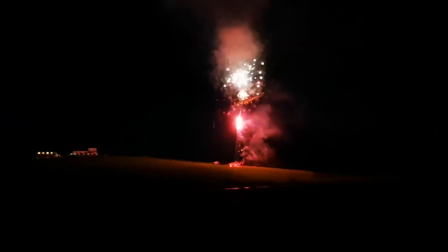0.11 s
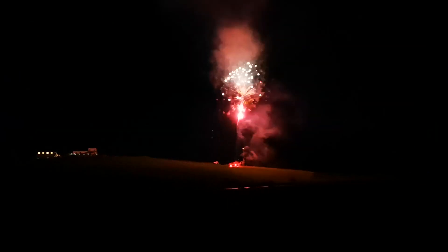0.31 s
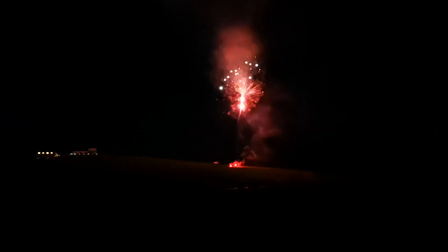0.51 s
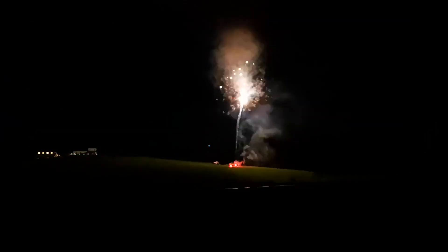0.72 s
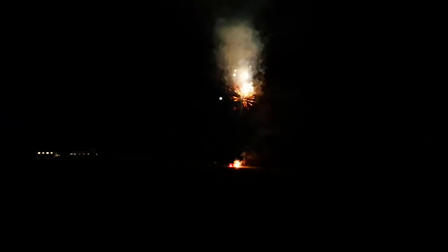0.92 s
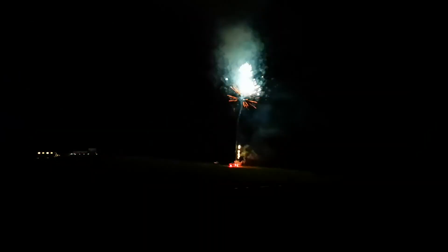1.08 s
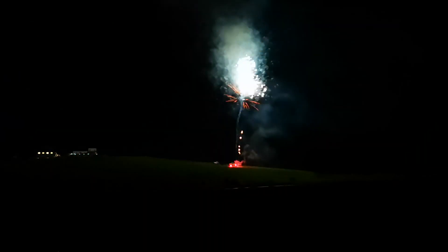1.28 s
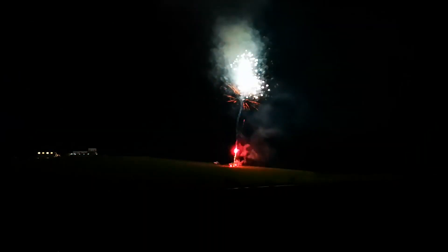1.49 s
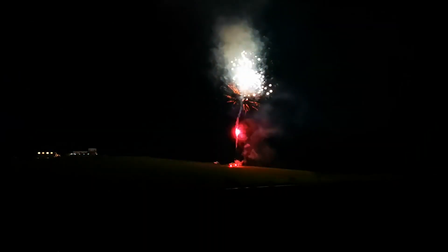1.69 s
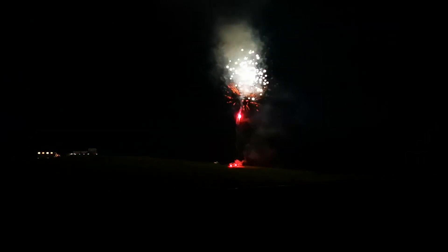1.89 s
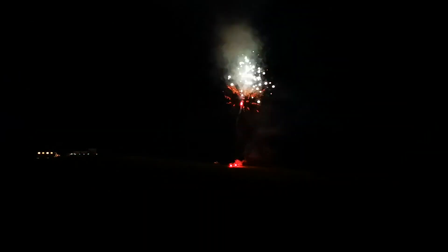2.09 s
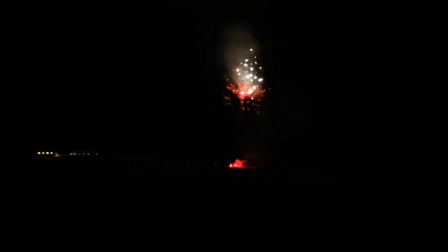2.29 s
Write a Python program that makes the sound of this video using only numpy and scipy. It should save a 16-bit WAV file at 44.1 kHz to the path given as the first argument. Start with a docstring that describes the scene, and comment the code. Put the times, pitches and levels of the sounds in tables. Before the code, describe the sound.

Sharp firework bursts and low mortar launch thumps, with soft echoes rolling over a dark field

```python
"""Sharp bangs and lower thumps of fireworks across an open field at night, over faint night air.
Six shells burst overhead: each is a pressure spike with a bounce off the ground and a dull slap echo.
Five more leave their mortar tubes: a low thump, a muzzle crack and a short ring of the tube.
Things near the microphone scatter every bang; the far edge of the field returns a long soft wash."""
import sys
import numpy as np
from scipy import signal
from scipy.fft import rfft, irfft
from scipy.io import wavfile
from scipy.ndimage import uniform_filter1d, minimum_filter1d

SR = 44100
rng = np.random.default_rng(int(sys.argv[2]) if len(sys.argv) > 2 else 0)


def to_wav(sig):
    """Store sig (one row per channel, or 1-D mono) as 16-bit WAV at the path in sys.argv[1].

    Samples outside -1..1 are clipped; the rate is SR.
    """
    pcm = np.clip(np.atleast_2d(sig), -1, 1) * 32767
    pcm = np.round(pcm).astype(np.int16)
    wavfile.write(sys.argv[1], SR, pcm.T)  # frames by channels


N = 108045
T = np.arange(N) / SR


def from_db(db):
    """Decibels to gain."""
    return 10 ** (np.asarray(db) / 20)


def at_hz(points, hz):
    """Read a table along log frequency."""
    table_hz, values = np.transpose(points)
    return np.interp(np.log(np.maximum(hz, 1)), np.log(table_hz), values)


def since(start_s):
    """Time elapsed after start_s, zero before it."""
    return np.maximum(T - start_s, 0)


def delayed(x, delay_s):
    """The same sound delay_s seconds later."""
    return np.interp(T - delay_s, T, x, left=0)


def ring_down(t, t60_s):
    """Exponential decay that falls 60 dB in t60_s."""
    return np.exp(-np.log(1000) * t / t60_s)


def through(x, response):
    """Send a sound through a one- or two-channel response."""
    return signal.fftconvolve(np.atleast_2d(x), np.atleast_2d(response), axes=1)[:, :N]


def causal_filter(points, size=8192):
    """Minimum-phase response with the given colour: the cepstrum is folded onto positive time."""
    hz = np.arange(size // 2 + 1) * SR / size
    cepstrum = irfft(np.log(from_db(at_hz(points, hz))))
    cepstrum[1:size // 2] *= 2
    cepstrum[size // 2 + 1:] = 0
    return irfft(np.exp(rfft(cepstrum)))


def band_pass(x, low_hz, high_hz):
    """Keep what lies between two frequencies."""
    x = x + 1e-18  # inaudible offset keeps the filters clear of denormal numbers
    x = signal.sosfilt(signal.butter(3, low_hz, "high", fs=SR, output="sos"), x)
    return signal.sosfilt(signal.butter(6, high_hz, fs=SR, output="sos"), x)


def wander(per_s):
    """A random curve of unit size that heads for a new value per_s times a second."""
    values = rng.standard_normal(2000)
    return np.interp(T * per_s, np.arange(len(values)), values)


# likeness of the left and right channels: pitch_hz, likeness (0 unrelated, 1 identical)
LIKENESS = [(60, .99), (200, 0.99), (450, 0.33), (1000, 0.02), (2000, 0.18), (8000, 0)]


def noise_bands():
    """Half-octave bands of stereo noise, alike in the bass and mostly unrelated above: (hz, band)."""
    edges = 22 * 2 ** (np.arange(20) / 2)
    warm_up = SR // 2  # samples dropped while the filters settle
    white = rng.standard_normal((2, 2, N + warm_up))  # neighbouring bands use different noise
    for k, (low, high) in enumerate(zip(edges, edges[1:])):
        band_filter = signal.butter(2, [low, high], "band", fs=SR, output="sos")
        mid, side = signal.sosfilt(band_filter, white[k % 2])[:, -N:]
        hz = np.sqrt(low * high)
        alike = np.clip(at_hz(LIKENESS, hz), 0, 1)
        opposed = side * [[1], [-1]]
        yield hz, np.sqrt((1 + alike) / 2) * mid + np.sqrt((1 - alike) / 2) * opposed


# colour of the night air before its overall level is set: pitch_hz, level_db (relative, per Hz)
AIR_COLOUR = [(25, -3.5), (45, -1.5), (65, 0), (90, -7), (150, -15), (400, -17), (900, -16.5), (1300, -19),
              (2000, -19.5), (3200, -29.5), (5000, -33.5), (7500, -38), (10000, -49), (15000, -56)]
# level of the air with the lingering wash of bursts, above the rumble: time_s, level_db (relative)
BACKGROUND_LEVEL = [(0, 4.5), (.7, 1), (1.3, 2), (1.9, 6.5), (2.45, 9.5)]
AIR_DB, AIR_FLICKER_DB, RUMBLE_TOP_HZ = -54, 2, 130


def night_air():
    """A faint rumble and hiss with lingering burst wash: noise bands, each wavering on its own."""
    background_db = np.interp(T, *np.transpose(BACKGROUND_LEVEL))
    air = 0
    for hz, band in noise_bands():
        flicker_db = AIR_FLICKER_DB * wander(9.2)
        level_db = at_hz(AIR_COLOUR, hz) + flicker_db + background_db * (hz > RUMBLE_TOP_HZ)
        air = air + band * from_db(level_db)
    return from_db(AIR_DB) * air / air.std()


# shell bursts: start_s, level_db (re a peak of 2, before colour), spike_ms (decay constant),
# bounce_ms (delay), bounce_db, slap_ms (delay), slap_db (before the slap band),
# scatter_db, wash_db (sends); bounce and slap levels are relative to the spike
BURSTS = [(0.232, 2, 0.17, 3.61, -9, 22.8, -19, -3, 0), (0.8573, 1, .1, 3.6, -11.5, 22.1, -25.5, 0, 0.5),
          (1.5549, 2.5, 0.078, 3.3, -14.5, 19, -22.5, -0.5, -1),
          (1.6230, -3, 0.14, 3.75, -8, 25.7, -18.5, 1, -6),
          (1.7143, 0.5, 0.072, 4.1, -11.5, 13.4, -26, 0.5, 0),
          (2.0064, -3, 0.13, 3.89, -8.5, 25.4, -19.5, 0.5, 2)]
# colour of a burst as the microphone and recorder give it, thin deep bass and dull top:
# pitch_hz, level_db
BURST_COLOUR = [(25, -10.5), (55, -11.5), (100, 0.5), (170, 4), (270, 5), (470, -2.5), (900, 2.5),
                (1300, 0.5), (1750, 5.5), (2500, 0.5), (4500, -6), (7600, -6), (9300, -15.5), (11000, -26),
                (16000, -37.5)]
SLAP_LOW_HZ, SLAP_HIGH_HZ = 610, 2820


def bursts():
    """A shock spike, its ground bounce and a dull slap; returns direct sound, scatter and wash feeds."""
    direct, slaps, scatter_feed, wash_feed = np.zeros((4, N))
    for start_s, db, spike_ms, bounce_ms, bounce_db, slap_ms, slap_db, scatter_db, wash_db in BURSTS:
        decay = np.exp(-np.minimum(since(start_s) * 1000 / spike_ms, 50))
        spike = 2 * from_db(db) * (T >= start_s) * decay
        bang = spike + from_db(bounce_db) * delayed(spike, bounce_ms / 1000)
        direct += bang
        slaps += from_db(slap_db) * delayed(spike, slap_ms / 1000)
        scatter_feed += from_db(scatter_db) * bang
        wash_feed += from_db(wash_db) * spike
    direct += band_pass(slaps, SLAP_LOW_HZ, SLAP_HIGH_HZ)
    return through([direct, scatter_feed, wash_feed], causal_filter(BURST_COLOUR))


# mortar launches: start_s, thump_db, thump_hz, ring_db, pitch (ratio to the tube table),
# tilt_db (ring, per octave above the first mode), crack_db (re an impulse of 10, before colour)
LAUNCHES = [(0.3292, -23, 103, -29.5, 0.95, 10.5, -19), (0.4278, -17, 94, -18.5, 1.095, -4, -14.5),
            (0.4630, -19.5, 93, -18.5, 1.033, 7.5, -9.5), (0.4934, -20, 95, -16.5, 1.0, -5, -12),
            (2.1638, -18, 95.7, -18, 1.05, 2.5, -25.5)]
# modes of the mortar tube: pitch_hz (before the pitch ratio), level_db (re ring_db), t60_s
TUBE_MODES = [(1555, -19, 0.012), (1613, 0.5, 0.014), (2160, -11.5, 0.0099), (2950, -6.5, .012),
              (3520, -15, 0.019), (5460, -45, 0.027), (6500, -17, 0.0057)]
# colour of the muzzle crack: pitch_hz, level_db
CRACK_COLOUR = [(300, -33.5), (900, -34.5), (1400, 5.5), (2200, 1.5), (3100, -0.5), (4400, -7.5),
                (6500, -15), (8500, -26.5), (11000, -50.5), (16000, -50.5)]
# dull echoes of the tube: delay_s, level_db
TUBE_ECHOES = [(.0098, -14.5), (0.0354, -14)]
THUMP_DECAY_S, THUMP_LEAD_S = .003, 0.00092  # the thump starts this much before the crack
BOOM_DB, BOOM_HZ, BOOM_T60_S = -17.5, 101, 0.064  # level relative to the thump
TUBE_LOW_HZ, TUBE_HIGH_HZ, TUBE_ECHO_HIGH_HZ = 1190, 6500, 2060


def launches():
    """The lift charge heaves the air, cracks at the muzzle and rings the tube: (thumps, knocks)."""
    thumps, rings, cracks = np.zeros((3, N))
    for start_s, thump_db, thump_hz, ring_db, pitch, tilt_db, crack_db in LAUNCHES:
        t = since(start_s - THUMP_LEAD_S)
        push = t ** 2 * np.exp(-t / THUMP_DECAY_S)
        swing = push / push.max() * np.sin(2 * np.pi * thump_hz * t)
        boom = from_db(BOOM_DB) * np.sin(2 * np.pi * BOOM_HZ * t) * ring_down(t, BOOM_T60_S)
        thumps += from_db(thump_db) * (swing + boom)

        t = since(start_s)
        for mode_hz, mode_db, t60_s in TUBE_MODES:
            tilted_db = tilt_db * np.log2(mode_hz / TUBE_MODES[0][0])
            chance_db = rng.standard_normal()
            strength = from_db(ring_db + mode_db + tilted_db + chance_db)
            rings += strength * np.sin(2 * np.pi * mode_hz * pitch * t) * ring_down(t, t60_s)
        cracks[int(start_s * SR)] += 10 * from_db(crack_db)

    knocks = band_pass(rings, TUBE_LOW_HZ, TUBE_HIGH_HZ)
    knocks = knocks + through(cracks, causal_filter(CRACK_COLOUR))[0]
    dull = band_pass(knocks, TUBE_LOW_HZ, TUBE_ECHO_HIGH_HZ)
    tube_echoes = sum(from_db(db) * delayed(dull, delay_s) for delay_s, db in TUBE_ECHOES)
    return thumps, knocks + tube_echoes


# reflections from things by the microphone, before the bass is cut: delay_ms, left_db, right_db
REFLECTIONS = [(.14, -9.5, -15.5), (.66, -14.5, -32.5), (1.06, -15, -19), (2.9, -13, -27.5),
               (13.2, -25.5, -24.5)]
REFLECTION_LOW_HZ = 348
SPRAY_DB, SPRAY_T60_S, SPRAY_LOW_HZ, SPRAY_HIGH_HZ = -6.5, .018, 2200, 10300


def close_reflections():
    """Direct path, a few reflections thin in bass and a fine bright spray, different at each ear."""
    fade = ring_down(T, SPRAY_T60_S)
    spray = band_pass(rng.standard_normal((2, N)), SPRAY_LOW_HZ, SPRAY_HIGH_HZ)
    spray = spray * fade / np.linalg.norm(fade)
    taps = 0
    for delay_ms, left_db, right_db in REFLECTIONS:
        tap = np.maximum(1 - np.abs(T - delay_ms / 1000) * SR, 0)  # impulse between samples
        taps = taps + from_db([[left_db], [right_db]]) * tap
    bass_cut = signal.butter(1, REFLECTION_LOW_HZ, "high", fs=SR, output="sos")
    taps = signal.sosfilt(bass_cut, taps + 1e-18)
    return (T == 0) + taps + from_db(SPRAY_DB) * spray


def echoes(colour, envelope_at):
    """Response of countless small echoes: noise bands, each under its own envelope."""
    response = 0
    for hz, band in noise_bands():
        envelope = envelope_at(hz)
        response = response + band * envelope * from_db(at_hz(colour, hz)) / np.linalg.norm(envelope)
    return response


def dying(t60s, delay_s, rise_s):
    """Envelope that builds up, then dies at each band's own rate."""
    t = since(delay_s)
    onset = 1 - np.exp(-t / rise_s)
    return lambda hz: onset * ring_down(t, at_hz(t60s, hz))


# colour of the scatter from things close by: pitch_hz, level_db
SCATTER_COLOUR = [(60, 5.5), (200, -8), (450, -4), (1000, -14), (2000, -13), (4000, -10.5), (9000, -9.5),
                  (13000, -3)]
# how long the scatter lasts: pitch_hz, t60_s
SCATTER_T60 = [(80, 0.22), (300, 0.24), (1000, 0.24), (3000, 0.18), (10000, 0.16)]
SCATTER_DELAY_S, SCATTER_RISE_S = 0.0013, 0.00084
SCATTER_LUMPS_PER_S, SCATTER_LUMP_DB = 420, 3


def near_scatter():
    """Response of things close by: a lumpy run of echoes that dies quickly."""
    fade = dying(SCATTER_T60, SCATTER_DELAY_S, SCATTER_RISE_S)
    lumps = from_db(SCATTER_LUMP_DB * wander(SCATTER_LUMPS_PER_S))
    return echoes(SCATTER_COLOUR, lambda hz: fade(hz) * lumps)


# colour of the wash from the far edge of the field: pitch_hz, level_db (before panning)
WASH_COLOUR = [(60, -30), (200, -22), (450, -13), (900, -18), (1300, -24), (2000, -19), (4000, -15.5),
               (7000, -9), (9500, -8.5), (13000, -11)]
# how long the wash lasts: pitch_hz, t60_s
WASH_T60 = [(100, 1.06), (700, 2.2), (2000, 3.2), (4500, 1.23), (10000, 0.96)]
# colour of one broad echo that stands out of the wash: pitch_hz, level_db (before panning)
FAR_ECHO_COLOUR = [(60, -2), (170, -18.5), (300, -28), (900, -22), (1300, -29.5), (1900, -22),
                   (4000, -20.5), (8000, -18), (14000, -15)]
WASH_DELAY_S, WASH_RISE_S = 0.0094, 0.024
FAR_ECHO_S, FAR_ECHO_WIDTH_S = 0.14, 0.046
WASH_LEFT_EARLY_MS, WASH_LEFT_DB = 0.8, 1.06


def far_field():
    """Response of the field's far edge: a long wash with one broad echo, coming from the left."""
    swell = np.exp(-.5 * ((T - FAR_ECHO_S) / FAR_ECHO_WIDTH_S) ** 2)
    wash = echoes(WASH_COLOUR, dying(WASH_T60, WASH_DELAY_S, WASH_RISE_S))
    left, right = wash + echoes(FAR_ECHO_COLOUR, lambda hz: swell)
    return np.array([left * from_db(WASH_LEFT_DB), delayed(right, WASH_LEFT_EARLY_MS / 1000)])


# sends of the launches into scatter and wash
THUMP_SCATTER_DB, THUMP_WASH_DB = -7, -20.5
KNOCK_SCATTER_DB, KNOCK_WASH_DB = 0, -5
LEFT_LATE_MS, LEFT_DB = 0.029, -1  # the direct sound at the left ear


def scene():
    """Bursts and launches heard directly, scattered close by and returned from afar, over night air."""
    air = night_air()
    bangs, scatter_feed, wash_feed = bursts()
    thumps, knocks = launches()
    left, right = through(bangs + thumps + knocks, close_reflections())
    direct = np.array([from_db(LEFT_DB) * delayed(left, LEFT_LATE_MS / 1000), right])
    scatter_feed = scatter_feed + from_db(THUMP_SCATTER_DB) * thumps + from_db(KNOCK_SCATTER_DB) * knocks
    wash_feed = wash_feed + from_db(THUMP_WASH_DB) * thumps + from_db(KNOCK_WASH_DB) * knocks
    near = through(scatter_feed, near_scatter())
    far = through(wash_feed, far_field())
    return direct + near + far + air


CEILING, TOP_STOP_HZ = .98, 17000  # limiter ceiling before the top cut; full 70 dB cut from here up


def record(dry):
    """A fast look-ahead limiter tames the spikes, then a steep low-pass cuts the top."""
    needed_gain = CEILING / np.maximum(np.abs(dry), CEILING)
    gain = uniform_filter1d(minimum_filter1d(needed_gain, size=31), size=31)  # sizes in samples
    top_cut = signal.cheby2(12, 70, TOP_STOP_HZ, fs=SR, output="sos")
    return signal.sosfilt(top_cut, dry * gain)


dry = scene()
out = record(dry)
to_wav(out)
```